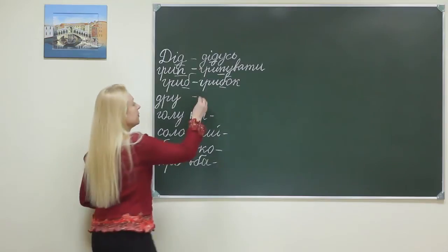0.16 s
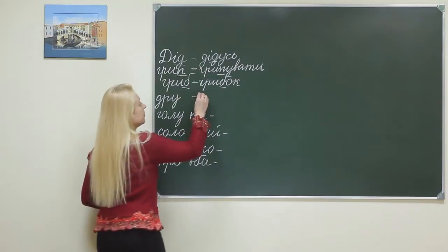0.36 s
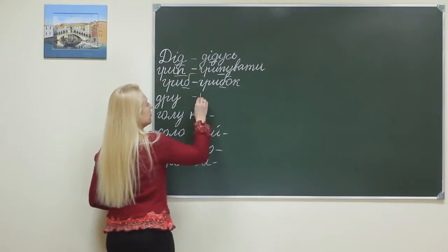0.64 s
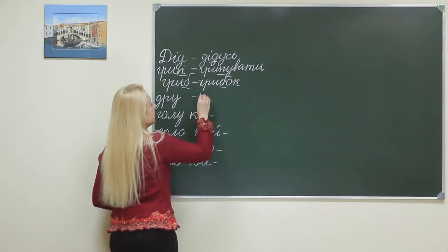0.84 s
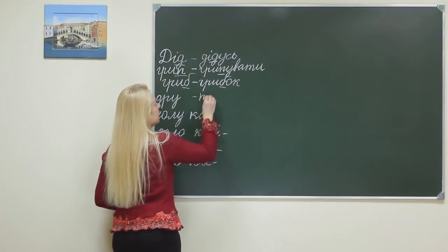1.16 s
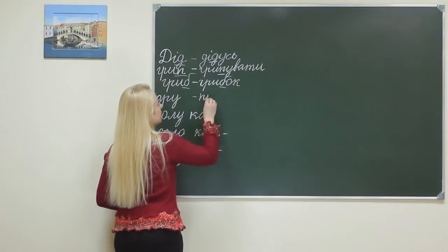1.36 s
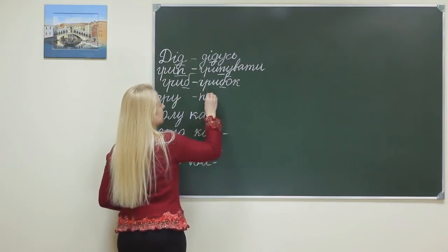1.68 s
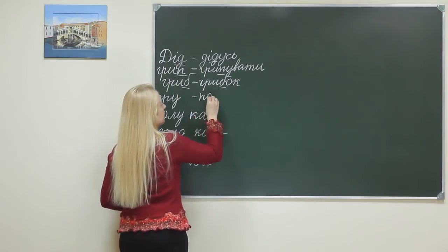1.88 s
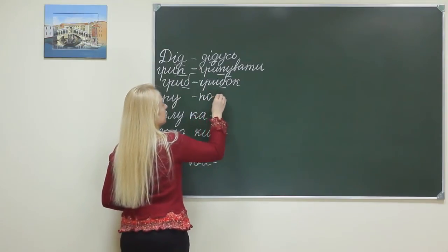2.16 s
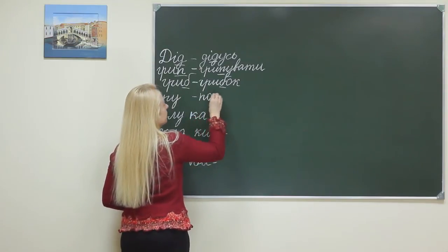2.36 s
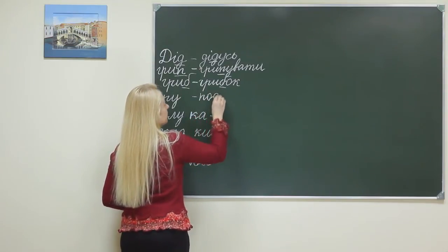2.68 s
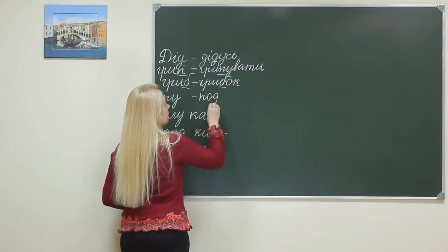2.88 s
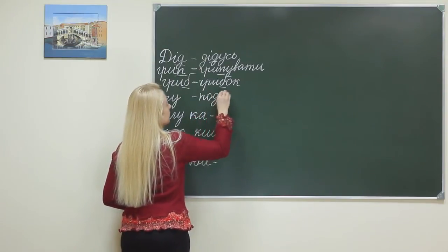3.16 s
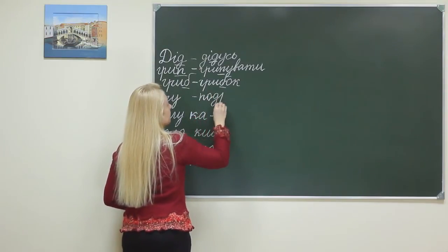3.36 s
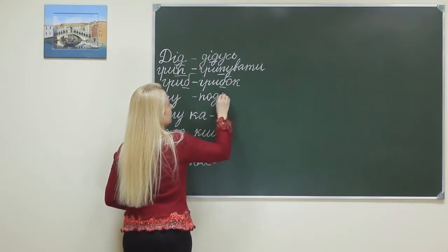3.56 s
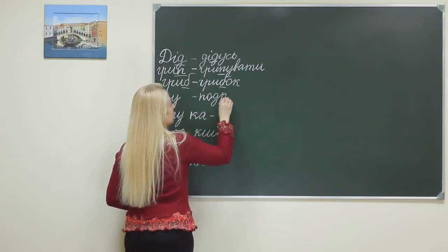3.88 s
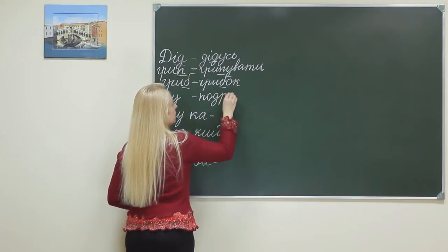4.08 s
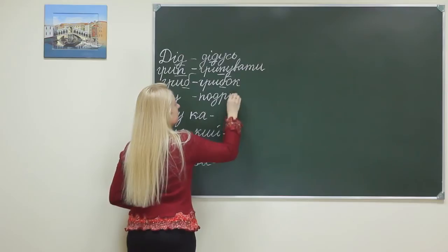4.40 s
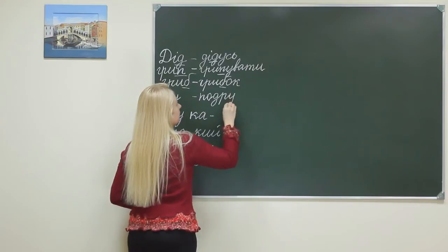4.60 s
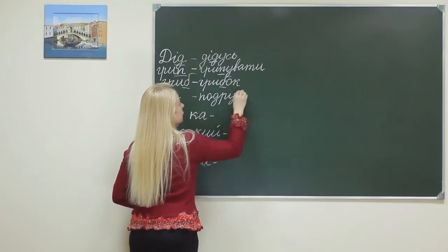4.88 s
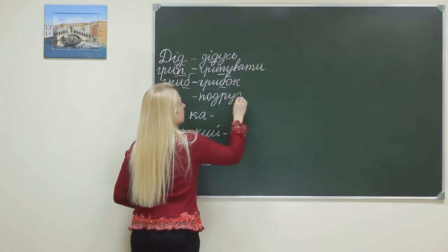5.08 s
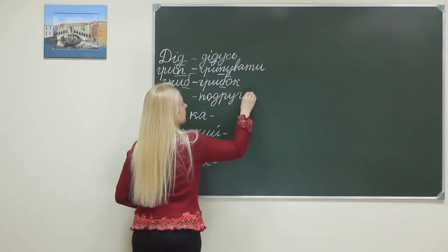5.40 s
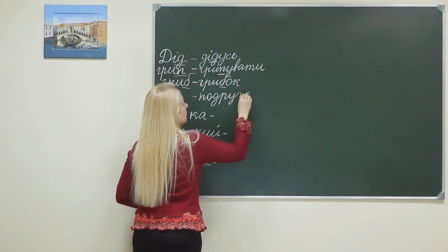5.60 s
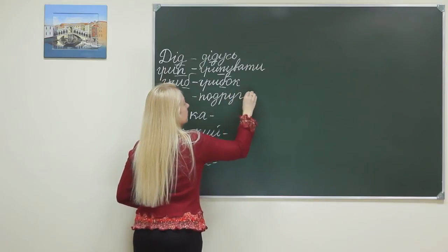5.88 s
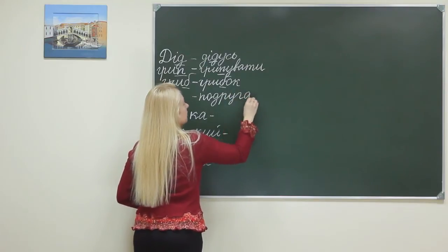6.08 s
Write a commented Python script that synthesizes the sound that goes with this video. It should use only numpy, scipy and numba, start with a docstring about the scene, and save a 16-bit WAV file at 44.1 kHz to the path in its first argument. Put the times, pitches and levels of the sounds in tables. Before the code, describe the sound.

After a faint rustle of cloth, a stick of chalk starts scraping lightly across a classroom chalkboard. The gritty, irregular strokes carry on throughout, making the panel rumble slightly, and are punctuated by crisp clicks with low knocks, two of them clearly louder than the rest. The microphone sits a few metres away in a small, quiet room with short echoes, low hiss and a faint electrical hum.

```python
"""Chalk on a classroom board

Chalk writes a word on a wall-mounted board in a quiet room, a few metres from one microphone.
Crumbling grit rings the chalk stick and shakes the board; some letters start with a tap.
Near walls return short echoes. A sleeve rustles once, over a steady hiss and a faint mains hum."""
import sys
import numpy as np
from scipy import signal
from scipy.fft import rfft, irfft
from scipy.io import wavfile
from scipy.ndimage import uniform_filter1d
from numba import njit

SR = 44100
rng = np.random.default_rng(int(sys.argv[2]) if len(sys.argv) > 2 else 0)


def transcribe(u):
    """Save the signal u as a 16-bit wav file named by the first command-line argument.

    u: samples, shape (n,) or (channels, n), limited to [-1, 1]; the rate is SR.
    q: integer samples, one column per channel.
    """
    v = np.clip(np.atleast_2d(u).T, -1, 1)
    q = np.round(v * 32767).astype(np.int16)
    wavfile.write(sys.argv[1], SR, q)


N = 275625
ROOM_FADE_S = 0.26  # time for the room's echo to fall by 60 dB

# The chalk stick's high resonances: pitch_hz, width_hz, level_db
STICK_TONES = [(5830, 1110, 10.5), (6470, 960, 7.5)]
# The bright fizz of fine dust: pitch_hz, width_hz, level_db
DUST_BANDS = [(7880, 690, 3), (9060, 1300, 6.5), (12400, 5200, -3.5)]
# One row per stroke, with shake, drag, rasp and dust levels relative to the scrape:
# full_speed_at_s, rise_s, hold_s, fall_s, scrape_db, shake_db, drag_db, rasp_db, dust_db, pitch_hz
CHALK_STROKES = [ (0.486, 0.0082, 0.04, 0.13, -74.5, 9.5, 3, -9, -6, 3850),
                 (0.677, 0.19, 0.061, 0.068, -68, -11.5, -11.5, -15, -12, 3800),
                 (.874, 0.09, 0.047, 0.056, -65.5, 1.5, -9, -12, -5.5, 3730),
                 (0.92, 0.025, 0.032, 0.073, -60.5, 6.5, -6, -6.5, -4.5, 4000),
                 (1.012, .03, 0.042, .05, -75.5, 7, 0, 0, -8, 4000),
                 (1.092, 0.14, 0.014, .1, -63, -7, -10.5, -9.5, -10, 4000),
                 (1.251, 0.1, 0, 0.1, -62, -1.5, -11, -5, -5, 4170),
                 (1.3, 0.041, 0.0092, 0.028, -76, 11.5, 4, -5, -8, 4000),
                 (1.372, 0.061, 0.056, 0.087, -63, -9, -13, -10, -10, 4170),
                 (1.558, 0.12, 0.1, .07, -67.5, -4, -18, -7.5, -8, 4090),
                 (1.648, 0.085, 0.028, 0.14, -64, 11, 1, -5.5, -6.5, 4100),
                 (1.758, 0.087, 0, 0.038, -59.5, -0.5, -9, -7, -7.5, 3880),
                 (1.99, .01, 0.0079, 0.049, -54, 9.5, -3, -6, -6, 3620),
                 (2.046, .05, 0.016, 0.064, -58.5, 4, -5, 0, -8.5, 3930),
                 (2.242, 0.0089, 0.095, 0.16, -67, 7, -8, -6, -7, 3620),
                 (2.39, .11, 0.0016, 0.12, -57, 2.5, -10, -13, -7.5, 3700),
                 (2.478, 0.18, 0, 0.068, -60.5, -12, -19, -17, -8, 3880),
                 (2.61, 0.2, 0.015, .1, -64.5, -3.5, -15, -9, -7.5, 3750),
                 (2.707, 0.017, 0.064, .06, -66.5, -18, -18, -18, -10, 3660),
                 (2.844, .15, 0.022, 0.099, -56.5, -7, -18, -17.5, -8, 3600),
                 (2.971, 0.071, 0.016, 0.041, -55, 4.5, -8.5, -5.5, -9.5, 3600),
                 (3.017, 0.059, .18, 0.043, -59.5, -5, -16.5, -9.5, -6.5, 3740),
                 (3.346, 0.13, 0.037, 0.056, -52.5, -9, -18.5, -20, -6, 3750),
                 (3.433, 0.025, .02, .1, -77, 13, -6.5, -1.5, -2, 3500),
                 (3.655, 0.012, 0, 0.066, -49, 8, -3.5, -3, -7, 3380),
                 (3.725, 0.11, 0.0035, 0.074, -55, 2.5, -10, -6, -3.5, 3700),
                 (3.876, 0.17, 0.0066, .085, -58, -7.5, -20, -16.5, -6, 4180),
                 (4.025, 0.079, 0.013, 0.11, -58, -2.5, -14.5, -9.5, -5.5, 3920),
                 (4.155, 0.048, 0.066, 0.14, -63, -8, -19, -16, -7, 4170),
                 (4.341, 0.058, 0.004, 0.073, -46, -0.5, -22, -12, -6, 3940),
                 (4.472, 0.084, 0.2, 0.027, -61, -4, -19, -15, -7, 3900),
                 (4.724, 0.053, 0.025, 0.043, -61.5, 12.5, -4, -0.5, -5, 3640),
                 (4.809, 0.12, 0.0049, 0.16, -43, -2.5, -17, -7, -8, 3850),
                 (4.884, 0.086, 0.0024, 0.11, -47.5, 4, -15, -10, -7, 3850),
                 (4.95, 0.037, 0.011, 0.021, -64, 10.5, -6, -8, -8, 3740),
                 (5.058, 0.12, 0.027, 0.16, -62.5, -3, -15.5, -15, -6.5, 3950),
                 (5.259, 0.073, 0.00073, 0.043, -53, -2.5, -9, -7, -5.5, 3700),
                 (5.488, 0.095, 0.022, 0.058, -61.5, 9, -0.5, -4.5, -4.5, 3800),
                 (5.556, 0.024, 0.012, .06, -64.5, 10.5, -1, -15, -6, 3610),
                 (5.598, 0.056, 0.018, 0.26, -56.5, -3.5, -13, -15, -6, 3970),
                 (5.858, 0.067, 0.011, 0.081, -54, 5.5, -8, -6, -4.5, 3920),
                 (6.043, 0.16, 0.0087, 0.12, -66, -3.5, -16.5, -20, -6.5, 3930),
                 (6.203, 0.15, 0, 0.039, -71, 1.5, -16, -6.5, -6, 3740)]


def chalk_writing():
    """Crumbling grit makes the stick ring, rasp and drag, and the dust fizz; lumps shake the board."""
    narrowness = np.c_[[0.98, 0.88, 1.01, 0.94, 1.04]]  # per layer; lower swells more broadly
    power = np.zeros((5, N))  # overlapping strokes add in power
    for *timing, scrape_db, shake_db, drag_db, rasp_db, dust_db, _ in CHALK_STROKES:
        gains = undb(scrape_db) * undb(np.c_[[0, shake_db, drag_db, rasp_db, dust_db]])
        power += (gains * swell(*timing) ** narrowness) ** 2
    stick_gain, shake_gain, drag_gain, rasp_gain, dust_gain = np.sqrt(power)
    strokes = np.array(CHALK_STROKES)
    # The stick's lower resonance moves with the grip angle, and the rasp follows below it.
    pitch_hz = np.interp(np.arange(N) / SR, strokes[:, 0], strokes[:, -1])
    slip = judder(per_s=120, depth_db=0.78)
    force = grit(per_s=12000, spread_db=4) * slip
    low_tone = moving_resonance(force, pitch_hz, width_hz=1270)
    stick = unit(resonances(force, STICK_TONES) + undb(-2) * low_tone)
    rasp = moving_resonance(force, 0.637 * pitch_hz, width_hz=714)
    drag = resonances(force, [(1307, 770, 0)])
    fine_grit = cut(grit(per_s=12000, spread_db=4) * slip, 2, [6500, 13500], "band")
    dust = unit(sum(undb(db) * band(fine_grit, hz, width) for hz, width, db in DUST_BANDS))
    scrape = stick_gain * stick + dust_gain * dust + drag_gain * drag - rasp_gain * rasp
    return undb(-1.5) * scrape, board_shake(shake_gain)


# The notes the board rings at: pitch_hz, level_db, fade_s (time to fall by 60 dB)
BOARD_NOTES = [(31.5, -9, 0.31), (74.3, -10, 0.22), (137.3, -3, 0.11), (177.6, -10, 0.055), (234, 8, 0.083),
               (307.5, 3, 0.072), (373, -4.5, 0.11), (461.5, -6.5, 0.085), (532, -11.5, 0.059),
               (676, -14, 0.051), (803, -35, 0.15)]


def board_ring(push, gains=1):
    """A push sets each of the board's notes ringing as a fading sine wave."""
    pitch_hz, level_db, fade_s = np.transpose(BOARD_NOTES)
    poles = np.exp((2j * np.pi * pitch_hz - np.log(1000) / fade_s) / SR)
    notes = [signal.lfilter([1], [1, -pole], push).imag for pole in poles]
    return (gains * undb(level_db)) @ np.array(notes)


def board_shake(strength):
    """Coarse lumps under the sliding chalk make the board rumble."""
    lumps = grit(per_s=2100, spread_db=1) * judder(per_s=29, depth_db=0.5)
    push = cut(lumps, 1, 140, "high")  # sliding moves the lowest notes less
    return board_ring(push * strength) / rms(board_ring(push))


def board_thud(samples):
    """A blow rings the board's notes in a different mix at each spot."""
    blow = np.zeros(samples)
    blow[:30] = np.hanning(30)
    spot_db = 1.2 * rng.standard_normal(len(BOARD_NOTES))
    signs = (-1.) ** np.arange(len(BOARD_NOTES))  # neighbours start opposed, so the boom builds up
    thud = board_ring(blow, signs * undb(spot_db))
    thud *= 1 - np.exp(-np.arange(samples) / SR / 0.016)  # the panel takes a moment to get going
    return thud / rms(thud[:SR // 30])


# The tone colour of a click: pitch_hz, width_hz, level_db
CLICK_BANDS = [(1435, 9000, 14), (2600, 3700, 9.5), (5560, 800, 10.5), (8000, 420, -20)]
# A click's echoes off the near walls: delay_s, level_db
WALL_ECHOES = [(.0075, -17), (0.014, 2.5)]


def chalk_click(brightness_hz):
    """The tip lands with a dry snap, followed by bright wall echoes and a duller tail."""
    t = np.arange(int(0.3 * SR)) / SR
    snap = np.exp(-t / 0.0016) * (1 - np.exp(-t / 0.0004))
    echoes = sum(undb(db) * np.exp(-np.abs(t - delay_s) / 0.0012) for delay_s, db in WALL_ECHOES)
    tail = undb(-9 - 60 * t / ROOM_FADE_S) + undb(-0.5) * np.exp(-t / 0.02)
    bursts = rng.standard_normal((3, len(t))) * np.array([snap, echoes, tail])
    bursts = sum(undb(db) * band(bursts, hz, width) for hz, width, db in CLICK_BANDS)
    tops_hz = np.clip(brightness_hz * np.array([2.4, 1.7, 1.1]), 300, 0.45 * SR)
    click = sum(cut(burst, 3, hz, "low") for burst, hz in zip(bursts, tops_hz))
    return click / rms(click[:SR // 60])


# Each time the chalk lands or catches: start_s, click_db, thud_db, brightness_hz
CHALK_TAPS = [(0.4626, -60, -55.5, 1030), (1.936, -30.5, -29, 5660), (2.186, -43, -43, 4460),
              (2.655, -70.5, -66.5, 6000), (2.699, -74, -73, 6000), (3.438, -89, -54.5, 1490),
              (3.621, -34.5, -30, 4030), (4.301, -74, -70, 6900), (4.334, -49, -50, 8000),
              (5.3804, -45.5, -38.5, 3960), (5.5933, -67, -58.5, 5500), (5.8156, -67, -73, 7000)]


def chalk_taps():
    """Each tap makes a click at the tip and a thud in the board."""
    clicks, thuds = np.zeros((2, N))
    for start_s, click_db, thud_db, brightness_hz in CHALK_TAPS:
        start = int(start_s * SR)
        click = chalk_click(brightness_hz)
        thud = board_thud(min(SR // 2, N - start))
        clicks[start:start + len(click)] += undb(click_db) * click
        thuds[start:start + len(thud)] += undb(thud_db) * thud
    return clicks, thuds


def room_echo(sound):
    """The walls answer the scraping with a short, smooth tail."""
    t = np.arange(int(0.3 * SR)) / SR
    tail = rng.standard_normal(len(t)) * undb(-60 * t / ROOM_FADE_S)
    reply = undb(-15) * tail / np.linalg.norm(tail)
    reply[0] = 1  # the direct sound
    return signal.fftconvolve(sound, reply)[:N]


# The arm lifting: loudest_at_s, rise_s, hold_s, fall_s, level_db
SLEEVE_MOVES = [(.138, .07, 0, .19, -64.5)]


def sleeve_rustle():
    """Cloth gives a brief, dull rustle as the arm lifts."""
    rustle = band(grit(per_s=3200, spread_db=1.5), hz=590, width_hz=1500)
    rustle *= judder(per_s=36, depth_db=-2.5)
    return sum(undb(db) * swell(*timing) for *timing, db in SLEEVE_MOVES) * unit(rustle)


# The tone colour of the hiss: pitch_hz, relative_level_db
HISS_SHAPE = [(25, -8.5), (60, 7.5), (114, -6), (400, -9), (800, -17.5), (2000, -17), (5000, -16.5),
              (10000, -20), (16000, -18.5)]


def recorder_hiss():
    """The recorder adds steady noise, strongest in the bass."""
    pitch_hz, level_db = np.transpose(HISS_SHAPE)
    all_hz = np.arange(N // 2 + 1) * SR / N + 1
    gains = undb(np.interp(np.log(all_hz), np.log(pitch_hz), level_db))
    return undb(-73.5) * unit(irfft(rfft(rng.standard_normal(N)) * gains, N))


# The four tones of the hum: pitch_hz, level_db
HUM_TONES = [(50, -92), (100, -85), (150, -90), (200, -93)]


def mains_hum():
    """Mains power hums faintly on one low note and its overtones."""
    t = np.arange(N) / SR
    return sum(undb(db) * np.sqrt(2) * np.sin(2 * np.pi * hz * t) for hz, db in HUM_TONES)


def grit(per_s, spread_db):
    """Grains break off at random, mostly small, a few larger."""
    hits = rng.random(N) < per_s / SR
    sizes = np.minimum(rng.exponential(size=N), 4)
    return hits * rng.choice([-1., 1.], N) * undb(spread_db * sizes)


def judder(per_s, depth_db):
    """Pressure jumps as a surface sticks and slips."""
    step = int(SR / per_s)
    jumps = np.repeat(rng.standard_normal(N // step + 1), step)
    return undb(depth_db * uniform_filter1d(jumps, step // 2)[:N])


def swell(full_at_s, rise_s, hold_s, fall_s):
    """One movement curves up from 0 to 1, holds, then falls back."""
    t = np.arange(N) / SR - full_at_s
    up, down = np.clip([1 + t / rise_s, 1 - (t - hold_s) / fall_s], 0, 1)
    return up ** 1.43 * down ** 1.87


def resonances(x, tones):
    """Broad resonances, each filtered twice so the gaps between them stay quiet."""
    return unit(sum(undb(db) * band(band(x, hz, width), hz, width) for hz, width, db in tones))


def moving_resonance(x, hz, width_hz):
    """One resonance that slides in pitch, also filtered twice."""
    return unit(moving_band(moving_band(x, hz, width_hz), hz, width_hz))


@njit
def moving_band(x, hz, width_hz):
    """Keep the sound near a pitch that moves sample by sample."""
    y = np.empty(len(x))
    band_state, low_state = 0., 0.
    for i in range(len(x)):
        tuning = np.tan(np.pi * hz[i] / SR)
        damping = width_hz / hz[i]
        swing = (band_state + tuning * (x[i] - low_state)) / (1 + tuning * (tuning + damping))
        band_state = 2 * swing - band_state
        low_state += 2 * tuning * swing
        y[i] = damping * swing
    return y


def band(x, hz, width_hz):
    """Keep the sound near one pitch."""
    return signal.lfilter(*signal.iirpeak(hz, hz / width_hz, fs=SR), x)


def cut(x, steepness, hz, keep):
    """Keep the "low" side, the "high" side or a "band" and cut the rest."""
    return signal.lfilter(*signal.butter(steepness, hz, keep, fs=SR), x)


def undb(db):
    """Turn decibels into a gain."""
    return 10 ** (np.asarray(db) / 20)


def rms(x):
    """The average strength of a sound."""
    return np.sqrt(np.mean(x ** 2))


def unit(x):
    """Scale to an average strength of 1."""
    return x / rms(x)


def scene():
    """Everything reaches one microphone; the two channels barely differ."""
    scrape, shake = chalk_writing()
    clicks, thuds = chalk_taps()
    mix = room_echo(scrape) + clicks + shake + thuds + sleeve_rustle() + recorder_hiss() + mains_hum()
    side = undb(-45.5) * mix
    return np.array([mix - side, mix + side])


def record(dry):
    """The microphone drops the deepest bass; the camera cuts the highest treble."""
    thinned = cut(dry, 1, hz=30, keep="high")
    treble_cut = signal.ellip(10, 0.2, 70, 15750, fs=SR, output="sos")
    return signal.sosfilt(treble_cut, thinned)


dry = scene()
out = record(dry)
transcribe(out)
```